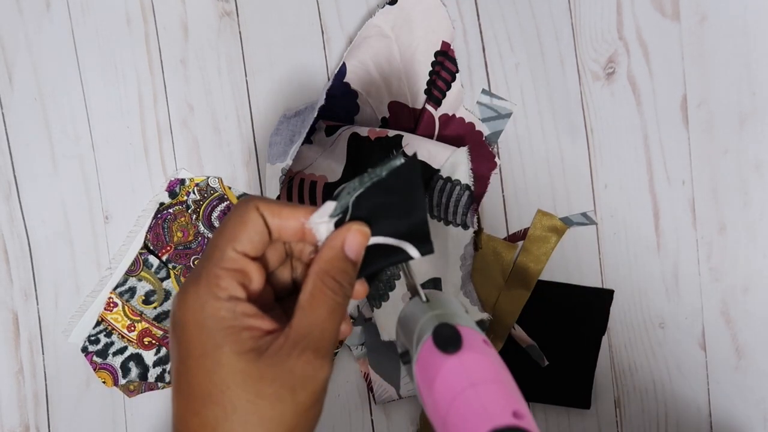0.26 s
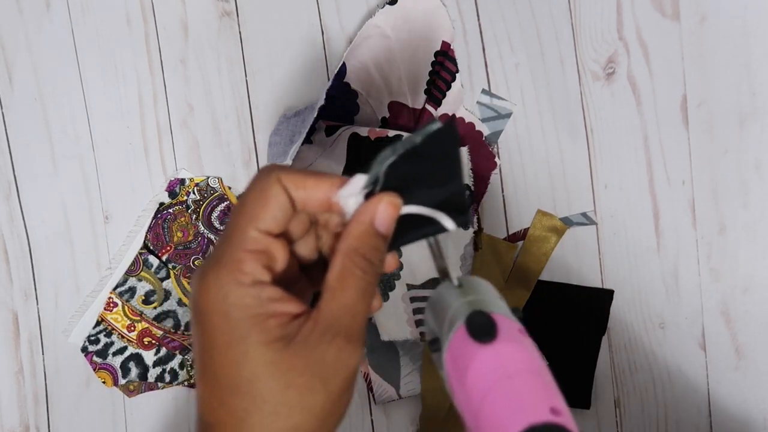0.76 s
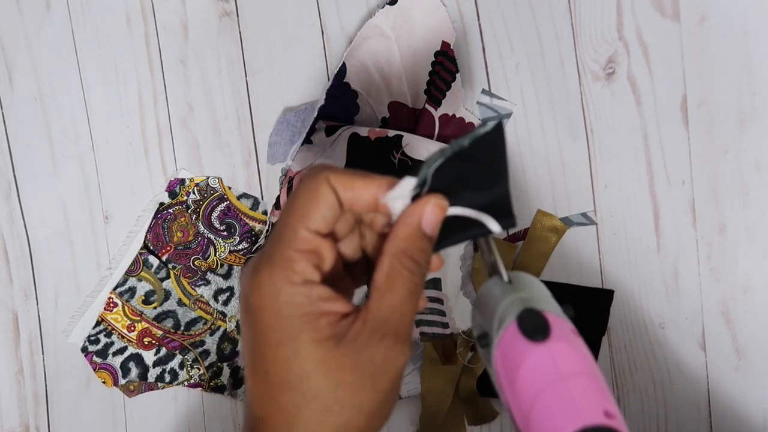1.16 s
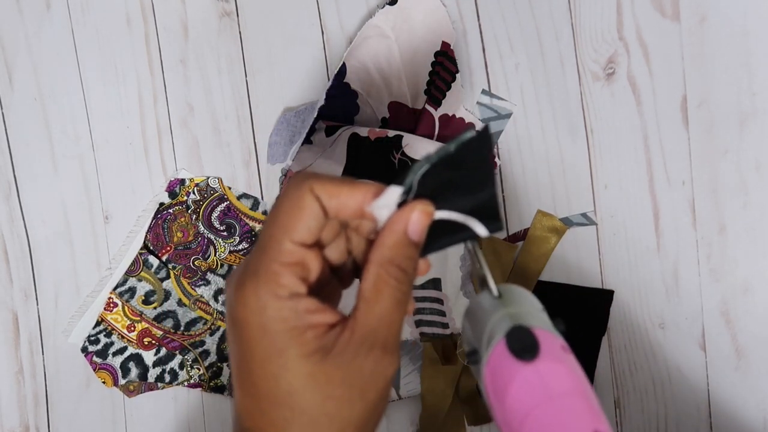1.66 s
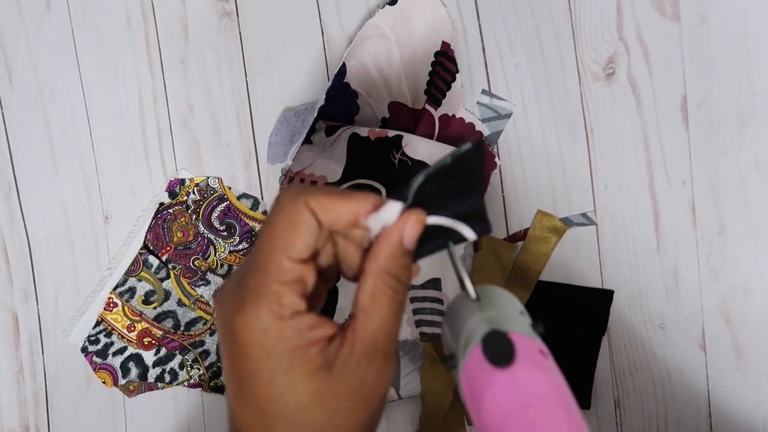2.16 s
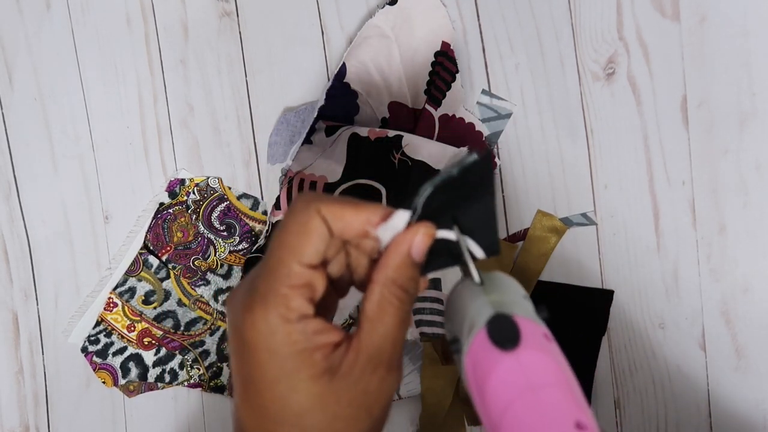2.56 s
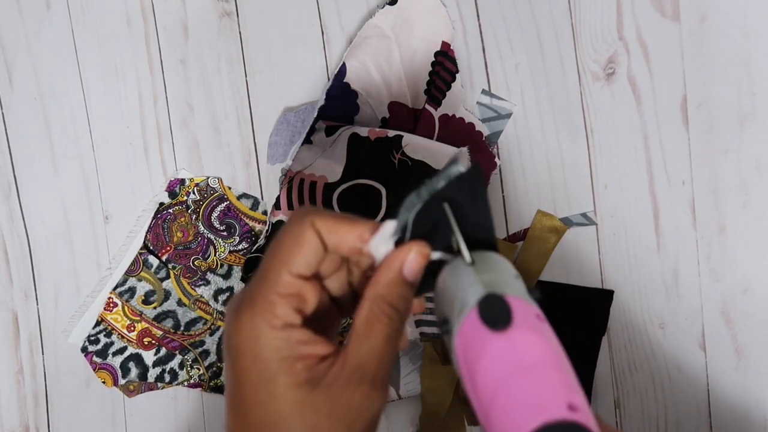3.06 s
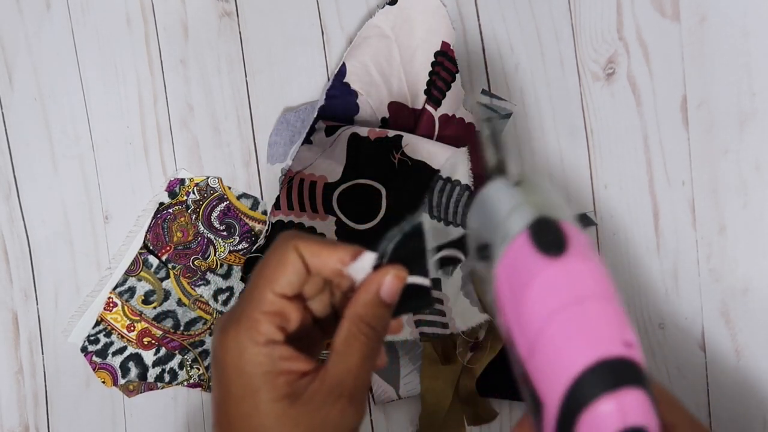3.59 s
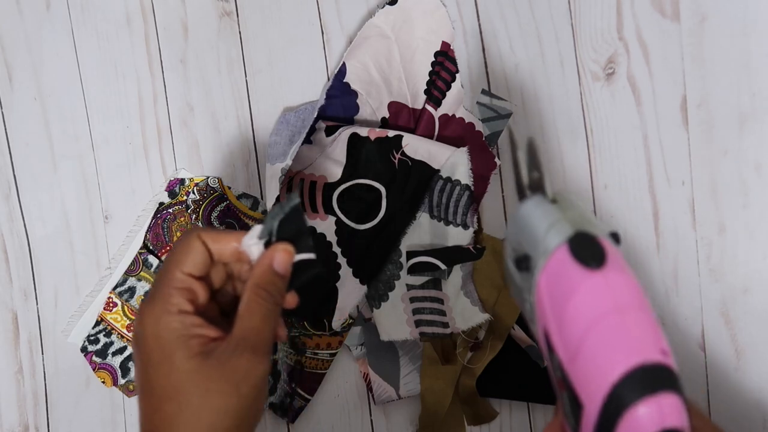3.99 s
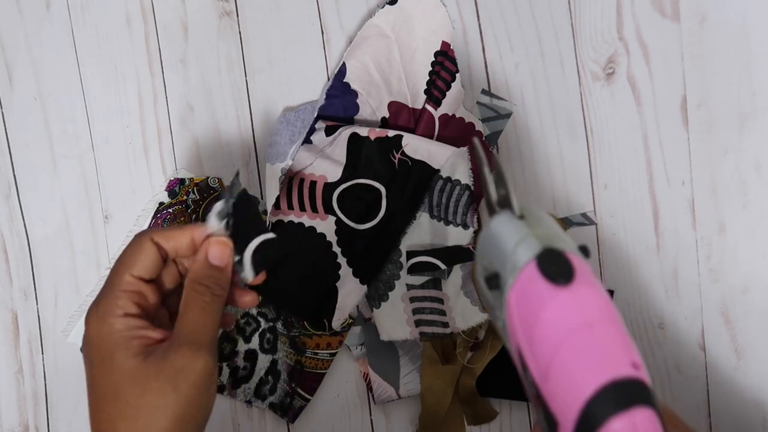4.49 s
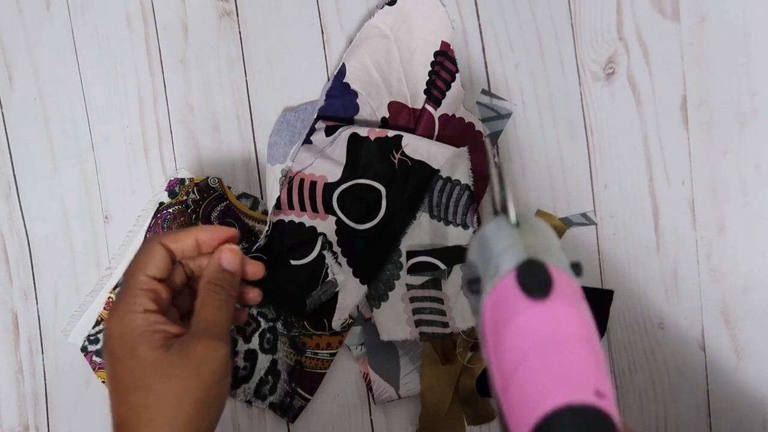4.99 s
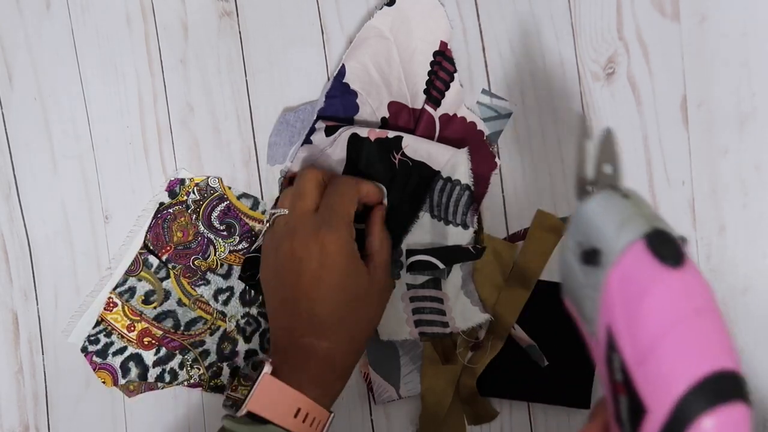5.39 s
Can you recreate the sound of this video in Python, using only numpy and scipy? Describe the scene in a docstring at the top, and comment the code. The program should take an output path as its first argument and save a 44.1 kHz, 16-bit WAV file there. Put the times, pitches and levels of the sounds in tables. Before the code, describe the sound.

Close, dry indoor pickup of a small motorised cutter: a rapid knocking buzz, bright metallic ring and rubbing hiss, central with slightly wide treble. It labours in fabric, slips loose with a brief scuff, then runs free, a little higher before drifting back down. A switch click cuts the power, plastic-sounding clacks separate and soften within a quarter second, then near silence remains.

```python
"""A hard buzz opens at once: electric scissors close to the microphone, over a table in a quiet room.
A small motor swings the blade about 153 times a second; it knocks at both ends and hisses through cotton.
Multiples of the stroke rate make the buzz and steel ring; pulsed noise makes the rubbing and hiss.
A scrape marks the cloth giving way; the blade speeds up, then runs free. The switch snaps off and
noise bursts at each half turn clack ever slower until the drive rests, leaving air noise and faint hum."""
import sys
import numpy as np
from scipy import signal
from scipy.fft import rfft, irfft, next_fast_len
from scipy.io import wavfile
from scipy.ndimage import uniform_filter1d

SR = 44100
rng = np.random.default_rng(int(sys.argv[2]) if len(sys.argv) > 2 else 0)


def int16_out(signal):
    """Quantize to a 16-bit WAV file."""
    q = np.round(np.clip(np.atleast_2d(signal).T, -1, 1) * 32767)
    wavfile.write(sys.argv[1], SR, q.astype(np.int16))


N = 248944
TIME = np.arange(N) / SR


def amp(db):
    """Decibels to gain."""
    return np.exp(np.asarray(db) * (np.log(10) / 20))


def unit(x):
    """Scale to rms 1."""
    return x / np.sqrt(np.mean(x ** 2) + 1e-20)


def along(points, hz):
    """Interpolate (frequency [Hz], value) points on a log frequency axis."""
    f, v = np.transpose(points)
    return np.interp(np.log(hz + 1), np.log(f + 1), v)


def curves(rows):
    """One value per sample for each column after the time."""
    s, *columns = np.transpose(rows)
    return [np.interp(TIME, s, column) for column in columns]


def wobble(rate):
    """A random curve with rate knots a second."""
    knots = rng.standard_normal(int(N * rate / SR) + 3)
    return np.interp(TIME * rate, np.arange(len(knots)), knots)


def filtered(x, response):
    """x times a response of frequency."""
    m = next_fast_len(N + 8192)
    return irfft(rfft(x, m) * response(np.fft.rfftfreq(m, 1 / SR)), m)[..., :N]


def noise(spectrum):
    """Coloured noise of rms 1."""
    white = rng.standard_normal(N)
    return unit(filtered(white, lambda hz: amp(along(spectrum, hz))))


def causal(gain):
    """The causal minimum-phase response that has these gains, by folding the cepstrum."""
    cepstrum = irfft(np.log(np.maximum(gain, 1e-6)))
    middle = len(cepstrum) // 2
    cepstrum[1:middle] *= 2
    cepstrum[middle + 1:] = 0
    return np.exp(rfft(cepstrum))


def lift(x, centre, half_width):
    """A resonance-shaped bump: 1 at the centre, a half at one half width away."""
    return 1 / (1 + ((x - centre) / half_width) ** 2)


def thin(x, corner_hz):
    """A small tool radiates hardly any bass: a second-order high-pass."""
    def highpass(hz):
        return (1j * hz) ** 2 / (corner_hz ** 2 - hz ** 2 + 1j * np.sqrt(2) * corner_hz * hz)
    return filtered(x, highpass)


def strokes(turn, back, back_db, fall):
    """Two dying knocks a turn: the blade shuts, then swings back; back and fall are in turns."""
    shut = np.exp(-(turn % 1) / fall)
    swing_back = np.exp(-((turn - back) % 1) / fall)
    return unit(shut + amp(back_db) * swing_back)


# The motor sags in the cloth, jumps as it gives way, then settles: (time [s], rate [strokes/s])
STROKE_RATE = [(0.1, 153.33), (1, 153), (1.72, 152.4), (2.33, 152.25), (2.57, 152.87), (2.63, 155.05),
               (3.2, 154.77), (3.5, 154.37), (3.85, 153.7), (4.18, 153.95), (4.45, 153.25), (4.9, 152.8)]
# Buzz with the blade in the cloth, at its edge and free: (multiple of stroke rate, relative level [dB])
BUZZ_CUT = [(1, -51), (2, -51.5), (3, -32), (4, -44.5), (5, -36.5), (6, -36), (7, -32), (8, -24),
            (9, -26.5), (10, -45.5), (11, -23.5), (12, -30.5), (13, -34), (14, -30.5), (15, -26.5),
            (16, -30.5), (17, -25.5), (18, -24.5), (19, -30.5), (20, -41.5), (21, -28.5), (22, -22.5),
            (23, -36), (24, -27.5), (25, -31), (26, -30), (27, -28), (28, -33), (29, -29.5), (30, -48),
            (31, -46), (32, -30.5), (33, -29.5), (34, -39), (35, -36.5), (36, -33), (37, -36), (38, -36.5)]
BUZZ_EDGE = [(1, -54.5), (2, -50), (3, -30.5), (4, -52.5), (5, -45), (6, -29), (7, -25), (8, -20.5),
             (9, -23.5), (10, -27), (11, -20), (12, -38), (13, -27), (14, -49), (15, -24), (16, -31.5),
             (17, -31.5), (18, -33), (19, -36.5), (20, -34.5), (21, -27), (22, -34), (23, -40), (24, -31),
             (25, -34), (26, -36.5), (27, -34.5), (28, -25.5), (29, -32), (30, -29), (31, -27.5), (32, -34),
             (33, -27.5), (34, -37.5), (35, -41.5), (36, -45), (37, -45.5), (38, -53)]
BUZZ_FREE = [(1, -51.5), (2, -57), (3, -35), (4, -66.5), (5, -38.0), (6, -37), (7, -26), (8, -24),
             (9, -30.5), (10, -35), (11, -23.5), (12, -30.5), (13, -30.5), (14, -41), (15, -36),
             (16, -30.5), (17, -27), (18, -25), (19, -29.5), (20, -38), (21, -28), (22, -32.5), (23, -31.5),
             (24, -40.5), (25, -36.5), (26, -29.5), (27, -37.5), (28, -36), (29, -28), (30, -36.5),
             (31, -45), (32, -35.5), (33, -36), (34, -37), (35, -41.5), (36, -35.5), (37, -29.5), (38, -33)]
# Knock on the way back in the cloth, at its edge, free: (strength [0-1]) for each
RETURN_KNOCK = [0.45, 0.81, 0.74]
# Trim in the cloth, at its edge, free; one row each: (buzz level [dB], rasp level [dB])
LOAD_TRIM = [(-0.65, -0.95), (-0.05, -1.5), (0.5, -1.3)]
# Shifts with the grip, jumps up in pitch as the cloth gives way: (time [s], resonance [Hz], lift [dB])
HOUSING = [(0.3, 1860, 14), (1.3, 1835, 7.5), (2.0, 1867, 15), (2.52, 1875, 14.5), (2.59, 1960, 13),
           (2.68, 1940, 12), (3.45, 1930, 11), (3.7, 1965, 14), (4.2, 1995, 13.5), (4.9, 1945, 9.5)]
# Shifts as the blades are loaded: (time [s], resonance [Hz], lift [dB])
BLADE = [(0.0, 4300, 10.5), (0.04, 4200, 4.5), (0.54, 4280, 6), (1.17, 4160, 6), (2.56, 4270, 8),
         (2.63, 4500, 5.5), (2.96, 4480, 7.5), (3.72, 4160, 7.5), (4.07, 4390, 4.5), (4.95, 4230, 11)]
HOUSING_WIDTH_HZ, BLADE_WIDTH_HZ = 59.5, 137  # half widths
RELEASE_S = 2.58  # the cloth gives way
DRONE_DB, DRONE_S = 8, 0.25  # swell of the two lowest multiples around that moment: height, half length


def buzz(turn, shares, flutter_db, bright_db, sway_db):
    """The repeating part of the knocks: multiples of the stroke rate, lifted by two moving resonances."""
    rate = curves(STROKE_RATE)[0]
    housing_hz, housing_db = curves(HOUSING)
    blade_hz, blade_db = curves(BLADE)
    level_db = np.array(LOAD_TRIM)[:, 0] @ shares + sway_db * wobble(6.7)
    drone_db = DRONE_DB * lift(TIME, RELEASE_S, DRONE_S)
    gains = amp(np.array([BUZZ_CUT, BUZZ_EDGE, BUZZ_FREE])[:, :, 1])
    # the housing rings after each knock, which delays its resonant multiples
    body = np.pad(uniform_filter1d(gains.mean(0), size=3), (1, 26), "edge")
    lag = np.angle(causal(body))
    # turning the odd multiples by up to a quarter cycle splits one knock a turn into two
    split = np.exp(.5j * np.pi * (np.array(RETURN_KNOCK) @ shares))
    out = np.zeros(N)
    spin, rotor = np.exp(2j * np.pi * turn), np.ones(N, complex)
    for order, gain in enumerate(gains.T, 1):
        rotor *= spin
        ring_db = housing_db * lift(order * rate, housing_hz, HOUSING_WIDTH_HZ)
        ring_db = ring_db + blade_db * lift(order * rate, blade_hz, BLADE_WIDTH_HZ)
        # higher multiples flutter more
        treble_db = order / len(BUZZ_CUT) * (bright_db + flutter_db * wobble(7))
        size = (gain @ shares) * amp(level_db + ring_db + treble_db + drone_db * (order <= 2))
        # the bright steel clack comes half a turn after the dull knock of the housing
        phase = lag[order] + np.pi * order * (order > 16) + .55 * rng.standard_normal()
        partial = rotor * np.exp(1j * phase) * (split if order % 2 else 1)
        out += size * partial.real
    return np.sqrt(2) * out


# The steel's bright ring above the buzz: (frequency [Hz], relative level per multiple [dB])
STEEL_RING = [(5900, 7.5), (6500, -0.5), (7100, 9.5), (7900, 0.5), (8600, -4.5), (9600, -7), (11000, 0),
              (11800, -3), (12500, -1), (13500, -11.5), (15000, -18)]


def zing(turn, drift_db, drift_rate):
    """High multiples in the steel; each drifts as the blades' point of contact moves."""
    out, spin = np.zeros(N), np.exp(2j * np.pi * turn)
    rotor = spin ** len(BUZZ_CUT)
    for order in range(len(BUZZ_CUT) + 1, 96):
        rotor *= spin
        db = along(STEEL_RING, order * STROKE_RATE[0][1]) + drift_db * wobble(drift_rate)
        out += amp(db) * (rotor * np.exp(2j * np.pi * rng.random())).real
    return unit(out)


def patchy(x, depth_db):
    """Resonances come and go as the blades' point of contact moves: smoothed random gains."""
    spectrum = signal.stft(x, nperseg=512)[2]
    field = rng.standard_normal(spectrum.shape)
    field = uniform_filter1d(field, size=4, axis=0)  # across frequency
    field = uniform_filter1d(field, size=70, axis=1)  # along time
    return unit(signal.istft(spectrum * amp(depth_db * unit(field)), nperseg=512)[1][:N])


# Where the blade works, 0 in the cloth, 1 at its edge, 2 free: (time [s], state [0-2])
STATE = [(0, 0.02), (2.55, 0.1), (2.61, 1), (3.44, 1.38), (3.49, 1.53), (3.85, 2)]
# Blades rubbing in the cloth, at its edge and free: (frequency [Hz], relative level [dB per Hz])
RASP_CUT = [(100, -53.5), (400, -32.5), (650, -19.5), (1000, -9), (1500, -5.5), (2100, -3.5), (2700, 3.5),
            (3050, -2), (3500, -0.5), (4300, 1.5), (5300, -2.5), (6400, -8.5), (7200, -8.5), (8800, -24)]
RASP_EDGE = [(100, -47.5), (400, -25.5), (650, -25.5), (1000, -6), (1500, -8.5), (2100, -1), (2600, -5.5),
             (3050, -6.5), (3600, 1.5), (4500, 0.5), (5200, -2.5), (5900, -10.5), (7200, -15),
             (8800, -23.5)]
RASP_FREE = [(100, -50.5), (400, -31.5), (650, -32), (1000, -2), (1500, -9.5), (2100, 1), (2750, 2.5),
             (3300, -1), (4300, 1.5), (5100, -1.5), (5700, -9), (6400, -1), (7400, -10), (8800, -28)]
# Hiss of the blade edges: (frequency [Hz], relative level [dB per Hz])
EDGE_HISS = [(4120, -55.5), (7000, -4), (8600, 1), (12400, -2.5), (14600, -10.5), (15700, -25)]
# How hard the blades rub: (time [s], relative rasp level [dB], relative hiss level [dB])
RUBBING = [(0.0, -14, -29), (0.26, -14, -30.5), (0.91, -13, -27.5), (2.16, -15.5, -28),
           (2.51, -14.5, -29.5), (2.66, -15.5, -27), (3.05, -16, -29), (3.42, -15, -27.5), (3.63, -15, -31),
           (4.95, -15.5, -31)]
OFF_S = 4.996  # the power is cut


def running(back=.5, buzz_db=-1.25, rasp_db=-5.0, hiss_db=-3, steel_db=2.5):
    """The powered blade: buzz, ringing and rubbing steel and hissing edges, all in step with the stroke."""
    # slightly uneven timing, in turns
    turn = np.cumsum(curves(STROKE_RATE)[0]) / SR + .0008 * wobble(130) + .0018 * wobble(20)
    colours = (RASP_CUT, RASP_EDGE, RASP_FREE)
    # crossfade between neighbouring states
    distance = np.abs(np.clip(curves(STATE)[0], 0, 2) - np.arange(len(colours))[:, None])
    shares = np.maximum(0, 1 - distance)
    rasp_level, hiss_level = curves(RUBBING)

    tone = amp(buzz_db) * buzz(turn, shares, flutter_db=3.0, bright_db=1.0, sway_db=0.33)
    steel = amp(hiss_level + steel_db) * zing(turn, drift_db=4.5, drift_rate=2.5)
    rubbing = np.zeros(N)
    for share, colour, (_, trim_db) in zip(shares, colours, LOAD_TRIM):
        rubbing += np.sqrt(share) * amp(trim_db) * noise(colour)
    # no two strokes rub equally hard
    uneven = amp(1 * wobble(200) + .5 * wobble(12))
    rasp_pulse = strokes(turn + .5, back, back_db=-4.5, fall=.9)
    rasp = amp(rasp_level + rasp_db) * uneven * rubbing * rasp_pulse
    hiss_pulse = strokes(turn + .5, back, back_db=-7.5, fall=0.48)
    hiss = amp(hiss_level + hiss_db) * uneven * patchy(noise(EDGE_HISS), depth_db=2.5) * hiss_pulse
    powered = np.exp(-np.maximum(TIME - OFF_S, 0) / 0.0017)
    return (tone + steel + thin(rasp + hiss, corner_hz=302)) * powered


# Still air in the room: (frequency [Hz], relative level [dB per Hz])
AIR = [(15, -33), (25, -15), (98, -3.5), (131, -11), (202, -5.5), (231, -15.5), (309, -7), (475, -12),
       (903, -17.5), (1310, -16), (3930, -27), (12800, -40), (15000, -62)]
# How loud the air is: (time [s], relative level [dB])
AIR_LEVEL = [(5.29, -58.5), (5.42, -60), (5.63, -54)]
# Faint steady tones: (frequency [Hz], level [dB])
HUM = [(60, -69.5), (90, -75.5), (120, -74)]


def room_tone(air_db=-1):
    """Still air as coloured noise, with rumble and a faint hum of sines."""
    hum = sum(np.sqrt(2) * amp(db) * np.sin(2 * np.pi * (hz * TIME + rng.random())) for hz, db in HUM)
    return amp(curves(AIR_LEVEL)[0] + air_db) * noise(AIR) + hum


def echo(x, decays):
    """A short diffuse answer of equal energy: noise that dies at its own speed in each band."""
    hz, t, z = signal.stft(rng.standard_normal(SR // 3), SR, nperseg=256)
    decay = amp(-60 * t / along(decays, hz)[:, None])
    tail = signal.istft(z * decay, SR, nperseg=256)[1]
    return signal.fftconvolve(x, tail / np.linalg.norm(tail))[:N]


# The blade leaving the cloth: (frequency [Hz], relative level [dB per Hz])
SLIP = [(100, -26), (650, -16), (950, -2), (1500, -12), (2000, 0.5), (2600, 0), (3200, -12.5), (4200, -3),
        (5200, -8.5), (9000, -24.5)]


def slip(width_s=0.028, slip_db=-20):
    """A short scrape of noise as the cloth lets go of the blade."""
    return amp(slip_db) * np.exp(-((TIME - RELEASE_S) / width_s) ** 2) * noise(SLIP)


REST_S, BRAKE = 5.24, 513  # the drive stands still; friction's loss [strokes/s per s]
SAG_S = 0.022  # the quicker first loss of speed


def coasting():
    """Turns of the unpowered drive, counted up to 0 at rest: a quick sag, then even braking."""
    excess_rate = STROKE_RATE[-1][1] - BRAKE * (REST_S - OFF_S)
    sag = excess_rate * SAG_S * np.exp(-np.maximum(TIME - OFF_S, 0) / SAG_S)
    return -BRAKE / 2 * np.maximum(REST_S - TIME, 0) ** 2 - sag


# The switch snapping off, a single row: (time [s], relative click level [dB], relative thump level [dB])
SWITCH = (4.9909, -10, 0)
# relative levels: a coasting stroke, the change on its way back, the housing's knock
CLACK_DB, RETURN_DB, CLACK_THUMP_DB = -14, -4, -35
FIRM_RATE, SOFTEN_DB = 54, 11.5  # below this rate [strokes/s] clacks weaken, by this much at rest


def contacts(turn, count):
    """The switch, then a clack at each of the last half turns, weaker as they slow."""
    half = np.arange(count)
    s = np.searchsorted(turn, -half / 2 - .006) / SR
    slow = np.maximum(1 - BRAKE * (REST_S - s) / FIRM_RATE, 0)
    click_db = CLACK_DB + RETURN_DB * (half % 2) - SOFTEN_DB * slow
    return [SWITCH] + [(at, db, CLACK_THUMP_DB) for at, db in zip(s, click_db)]


# Broad colour of the coasting drive: (frequency [Hz], relative level [dB per Hz])
SHELL = [(150, -74), (250, -44), (384, -21), (448, -35.5), (675, -11.5), (761, -33), (1000, -4.5),
         (1390, -6), (2060, -8.5), (2800, -2), (3810, -14), (4520, -8), (4930, -13.5), (5650, -18),
         (15000, -39.5)]
# Modes of the plastic housing: (frequency [Hz], width [Hz], relative level [dB])
SHELL_MODES = [(963, 110, 2), (2570, 64, -5), (3500, 140, 1.5), (4020, 32, -0.5), (4700, 28, -14),
               (4570, 44, -14), (5400, 31, -1)]


def shell_noise(modes_db):
    """Rattle coloured by the plastic housing and its modes, damped resonators of alternating sign."""
    def modes(hz):
        total = 0
        for k, (centre, width, db) in enumerate(SHELL_MODES):
            resonator = 1j * hz * width / (centre * centre - hz * hz + 1j * hz * width)
            total = total + (-1) ** k * amp(db) * resonator
        return total
    ringing = unit(filtered(rng.standard_normal(N), modes))
    return unit(noise(SHELL) + amp(modes_db) * ringing)


# Rattle of the coasting drive: (time [s], relative level [dB])
COAST = [(5.0, -10), (5.012, -13), (5.112, -20.5), (5.202, -30.5), (5.22, -53)]
# The housing's knock: (frequency [Hz], relative level [dB], time to fall by 60 dB [s])
THUMP = [(426, -11, 0.026), (850, -8.5, 0.013), (1015, -4, 0.028), (1360, 2.5, 0.022)]


def stopping(coast_db=-5.0, clack_db=-4.0, thump_db=-6, hum_db=-30, ring_s=0.0022, soft_hz=3800):
    """The switch snaps, friction brakes the drive and its strokes come apart into clacks."""
    since = np.maximum(TIME - OFF_S, 0)
    turn = coasting()
    fade = (TIME > OFF_S) * np.exp(-np.maximum(TIME - COAST[-1][0], 0) / .01)
    rattle = amp(curves(COAST)[0] + coast_db) * fade * strokes(turn, .5, back_db=-2.5, fall=0.45)
    # the third multiple of the slowing stroke rate
    hum = amp(hum_db) * (TIME > OFF_S) * np.exp(-since / 0.019) * np.sin(6 * np.pi * turn)

    blows, thumps = np.zeros(N), np.zeros(N)
    age = np.arange(SR // 10) / SR
    blow = np.exp(-age / ring_s) * (1 - np.exp(-age / .0005))
    soft_start = np.sin(np.pi / 2 * np.minimum(age / .002, 1)) ** 2
    for s, click_db, low_db in contacts(turn, count=15):
        start = round(s * SR)
        blows[start:][:len(age)] += amp(click_db) * blow
        for hz, mode_db, t60 in THUMP:
            decay = amp(low_db + mode_db - 60 * age / t60)
            thumps[start:][:len(age)] += decay * np.sin(2 * np.pi * hz * age) * soft_start
    # slow contacts are softer and lose their treble
    clack = shell_noise(modes_db=-8.0)
    dull = filtered(clack, lambda hz: 1 / (1 + (hz / soft_hz) ** 4))
    brightness = np.interp(TIME, [5.16, 5.23], [1.9, .1])
    clacks = amp(clack_db) * blows * (dull + brightness * (clack - dull))
    knocks = rattle * shell_noise(modes_db=-6.5) + clacks + amp(thump_db) * thumps
    return hum + thin(knocks, corner_hz=383)


def scattered(hz):
    """Random delays of up to 12 ms above 1500 Hz make the treble diffuse and wide."""
    grid = np.arange(0, SR, 40)
    delay = np.interp(hz, grid, rng.uniform(0, .012, len(grid)))
    # phase is the running sum of delay over frequency
    return 1j * np.exp(-2j * np.pi * np.cumsum(delay * (hz > 1500)) * hz[1])


# Spread over the two capsules: (frequency [Hz], side minus mid level [dB])
WIDTH = [(100, -11.5), (1200, -41.5), (2500, -28.5), (5000, -23), (7000, -34.5), (9000, -1), (11000, -2.5),
         (14000, -2.5)]
# The room's decay: (frequency [Hz], time to fall by 60 dB [s])
ROOM = [(200, 0.19), (2000, 0.37), (10000, 0.26)]
ROOM_DB = -20  # the room's answer, against the direct sound


def scene():
    """The tool is central and close; mainly its treble reaches the two capsules differently."""
    tool = running() + slip() + stopping()
    mid = tool + amp(ROOM_DB) * echo(tool, ROOM) + room_tone()
    side = filtered(mid, lambda hz: amp(along(WIDTH, hz)) * scattered(hz))
    trim = amp([[.27], [-.27]])  # decibels to gain, about 1.03 and 0.97, one for each capsule
    return np.array([mid + side, mid - side]) * trim


TOP_HZ = 15850  # band limit, reached by a 500 Hz slope


def record(dry):
    """Peaks are rounded near full scale; nothing is kept above the band limit."""
    rounded = dry / (1 + np.abs(dry) ** 8) ** (1 / 8)
    return filtered(rounded, lambda hz: np.clip((TOP_HZ - hz) / 500, 0, 1))


dry = scene()
out = record(dry)
int16_out(out)
```